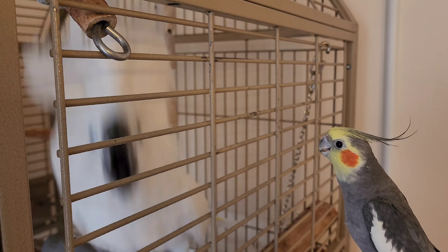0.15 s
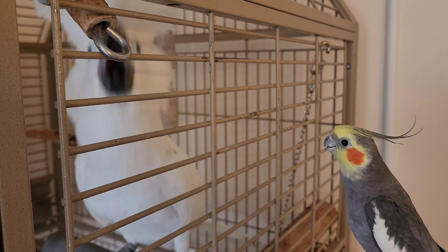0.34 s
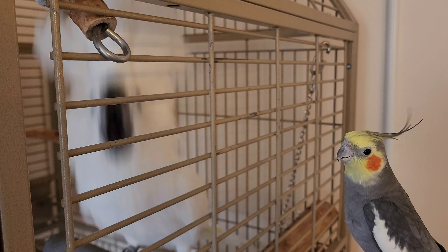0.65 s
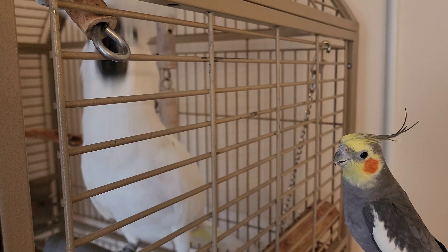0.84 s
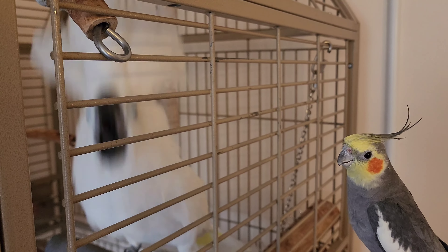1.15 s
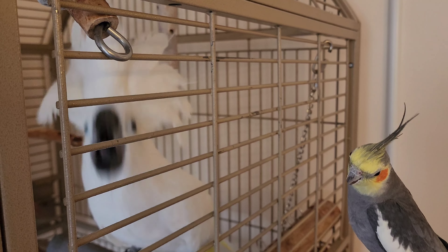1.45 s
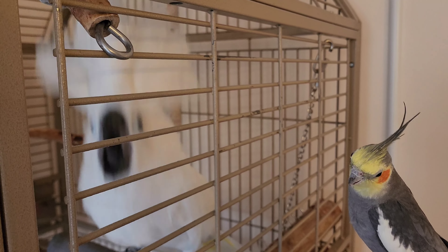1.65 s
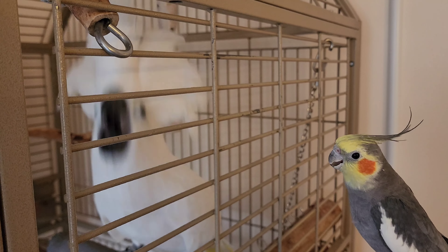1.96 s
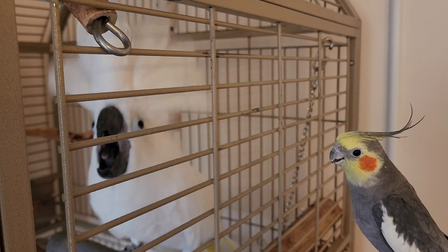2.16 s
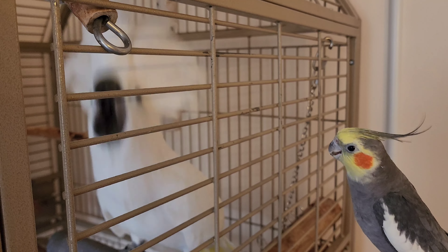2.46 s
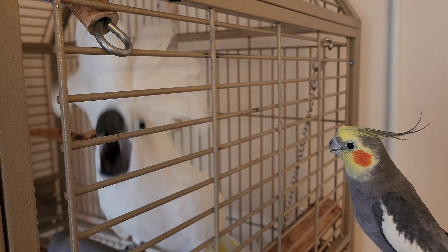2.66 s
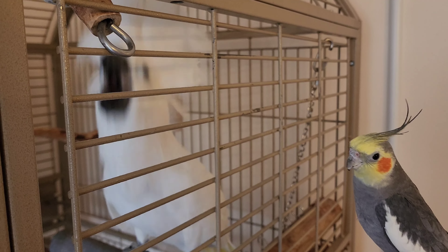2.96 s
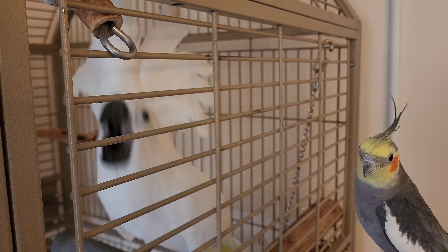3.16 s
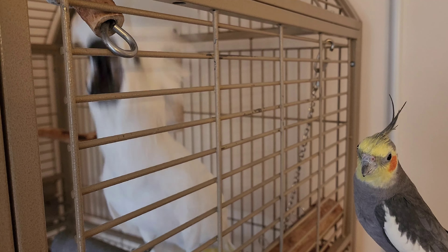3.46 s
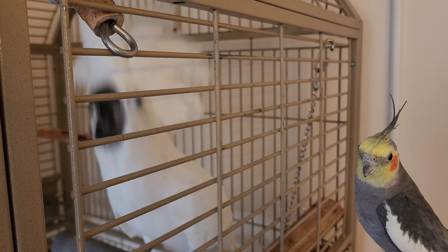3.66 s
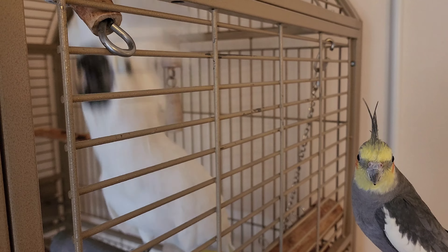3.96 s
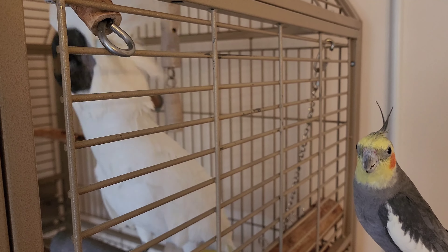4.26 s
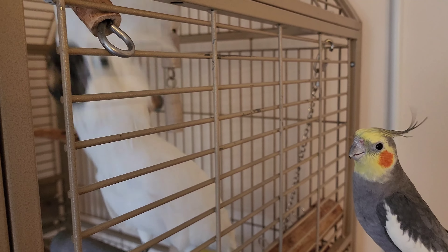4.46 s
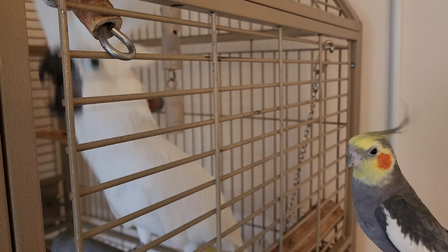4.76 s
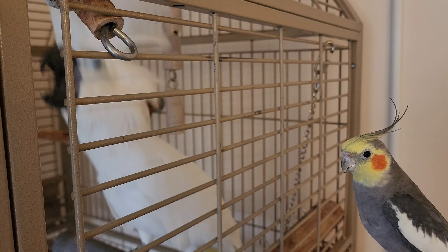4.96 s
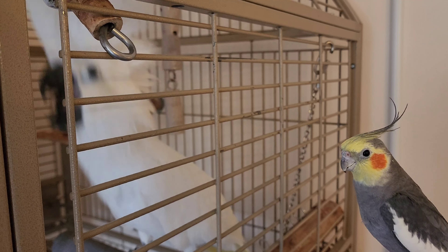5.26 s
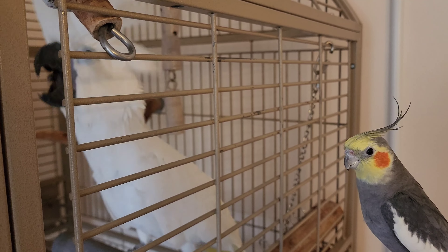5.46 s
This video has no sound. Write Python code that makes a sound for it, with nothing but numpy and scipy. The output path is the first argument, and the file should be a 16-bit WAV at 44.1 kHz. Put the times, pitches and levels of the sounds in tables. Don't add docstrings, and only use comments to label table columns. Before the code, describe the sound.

A cockatoo in a wire cage opens with a breathy rasp that jumps into a whistle and a rough squawk. After a pause come a thin whistle, a long surging squawk and a quick bark, then a rattle of the cage and a last broken squawk. Claws tick throughout. Small quiet room, faint low hum, close stereo microphone with the bird slightly to the right.

```python
import sys
import numpy as np
from scipy import signal
from scipy.fft import rfft, irfft, next_fast_len
from scipy.io import wavfile
from scipy.ndimage import uniform_filter1d

SR = 44100
rng = np.random.default_rng(int(sys.argv[2]) if len(sys.argv) > 2 else 0)


def waveform_to_disk(signal):
    frames = np.transpose(np.atleast_2d(signal))
    scaled = np.clip(frames, -1, 1) * 32767
    samples = np.round(scaled).astype(np.int16)
    wavfile.write(sys.argv[1], SR, samples)


def decibels_to_gain(level_db):
    exponent = np.asarray(level_db, float) / 20
    return 10 ** exponent


N = 247401

# (pitch_hz, level_db [dB per Hz])
SCUFF = [(240, -32), (400, -6.5), (943, -43), (1210, 0), (1660, -6.5), (4110, -12.5), (7810, -9.5),
         (11600, -9.5), (15600, -11)]
# (start_s [s], effort_db [dB], mouth_hz [Hz])
RASPS = [
    [(0, -43, 2459), (.04, -35.5, 2462), (.076, -38, 2363), (.1, -43, 2531)],
    [(4.108, -71.5, 2610), (4.124, -54.5, 2618), (4.14, -57, 2700), (4.174, -48.5, 3151),
     (4.232, -39.5, 3225), (4.25, -40.5, 3233)],
    [(4.25, -42, 3230), (4.274, -45.5, 3150), (4.3, -50.5, 2997)],
]


def rms_one(x):
    return x / np.sqrt(np.mean(x ** 2) + 1e-20)


def in_time(rows, times):
    s, *columns = np.transpose(rows)
    return [np.interp(times, s, c) for c in columns]


def at_hz(points, hz):
    points = np.array(points, float)
    return np.interp(np.log(hz + 1), np.log(points[:, 0] + 1), points[:, 1])


def coloured(x, spectrum):
    size = x.shape[-1]
    hz = np.arange(size // 2 + 1) * SR / size
    return rms_one(irfft(rfft(x) * decibels_to_gain(at_hz(spectrum, hz)), size))


def drift(size, rate_hz):
    r = np.exp(-2 * np.pi * rate_hz / SR)
    white = rng.standard_normal(size + 4000)
    return rms_one(signal.lfilter([1], [1, -2 * r, r * r], white)[4000:])


def resonance(x, hz, width_hz):
    r = np.exp(-np.pi * width_hz / SR)
    return signal.lfilter([1, 0, -1], [1, -2 * r * np.cos(2 * np.pi * hz / SR), r * r], x)


def moving_resonance(x, hz, width_hz):
    turn = np.exp(2j * np.pi * np.cumsum(hz) / SR)
    peak = signal.lfilter([1], [1, -np.exp(-np.pi * width_hz / SR)], x / turn)
    skirts = signal.butter(2, 0.68 * width_hz, fs=SR, output="sos")
    return np.real(signal.sosfilt(skirts, peak) * turn)


def evened(x):
    return x / np.sqrt(uniform_filter1d(x ** 2, size=530) + 1e-12)


def ring(clicks, hz, t60):
    r, w = decibels_to_gain(-60 / (t60 * SR)), 2 * np.pi * hz / SR
    return signal.lfilter([0, np.sin(w)], [1, -2 * r * np.cos(w), r * r], clicks + 1e-18)


def moments(rows):
    times = np.arange(N) / SR
    return sum(height * np.exp(-((times - s) / half) ** 4) for s, half, height in rows)


def syllables(tables):
    times = np.arange(N) / SR
    gate = sum((times >= rows[0][0]) & (times < rows[-1][0]) for rows in tables)
    columns = in_time([row for rows in tables for row in rows], times)
    return [uniform_filter1d(np.asarray(c, float), size=130) for c in [gate, *columns]]


def echoes(size):
    # (pitch_hz [Hz], t60_s [s])
    room_t60 = [(300, .1), (1500, .34), (2600, .25), (3300, .24), (4100, .3), (5000, .18), (14000, .12)]
    after = np.arange(SR // 2) / SR
    white = rfft(rng.standard_normal((2, len(after))))
    hz = np.arange(len(after) // 2 + 1) * 2.
    centres, t60s = np.transpose(room_t60)
    reply = 0
    for one, t60 in zip(np.eye(len(centres)), t60s):
        band = irfft(white * at_hz(np.transpose([centres, one]), hz))
        reply = reply + band * decibels_to_gain(-60 * after / max(t60, .02))
    onset = np.clip((after - .004) / .012, 0, 1)
    return rfft(reply * onset / np.sqrt(0.024 * SR), size)


def at_ports(x, room_db, bird):
    # (pitch_hz [Hz], level_db [dB])
    balance = [(60, 4), (110, -12), (200, 1), (380, 6.5), (700, 3), (1290, -4.5), (2380, -11),
               (4400, -10.5), (8120, -8.5), (15000, -14)]
    # (pitch_hz [Hz], phase [radians])
    lead = [(0, 0), (430, 0.1), (1460, -1.3), (3270, -0.1), (3620, -0.7), (4650, -0.3), (6800, -1.3),
            (8010, -0.4), (9470, 9.2), (12000, 16.3), (13000, 16.0), (13400, 17.9), (15000, 19.8),
            (15300, 19.2)]
    size = next_fast_len(N + SR // 2)
    hz, spectrum = np.arange(size // 2 + 1) * SR / size, rfft(x, size)
    half = decibels_to_gain(at_hz(balance, hz) / 2)
    if bird:
        half = half * np.exp(.5j * np.interp(hz, *np.transpose(lead)))
        both = 2 / np.abs(half + 1 / half).clip(1.)
    else:
        half, both = half * np.exp(1j * np.pi * hz * .00018), 1.4
    direct = np.array([both * half, both / half])
    return irfft(spectrum * (direct + decibels_to_gain(room_db) * echoes(size)), size)[:, :N]


def appliance_hum():
    # (pitch_hz [Hz], level_db [dB per Hz])
    rumble = [(12, -41.5), (20, -8.5), (43, -2), (102, -13), (129, -10), (188, -6.5), (221, -1.5),
              (329, -8), (409, -9), (439, -7.5), (608, -17), (783, -12.5), (1500, -32), (1950, -62.5),
              (3300, -120)]
    # (pitch_hz [Hz], width_hz [Hz], level_db [dB])
    tones = [
        (146.3, 13.84, -63),
        (220.6, 2.9, -64),
        (437, 53.4, -67.5),
    ]
    shared = decibels_to_gain(-58.0) * coloured(rng.standard_normal(N + 8), rumble)
    for hz, width_hz, level_db in tones:
        shared += decibels_to_gain(level_db) * rms_one(resonance(rng.standard_normal(N + 8), hz, width_hz))
    own = decibels_to_gain(-66.5) * coloured(rng.standard_normal((2, N)), rumble)
    return np.array([shared[8:], shared[:N]]) * decibels_to_gain(np.array([[1.2], [-1.2]])) + own


def hiss_level():
    times = np.arange(N) / SR
    peak_s, rise_db_per_s, fall_db_per_s = 0.031, 190, 35.5
    rustle_db = -46.5 - np.maximum(rise_db_per_s * (peak_s - times), fall_db_per_s * (times - peak_s))
    steady_db = -57.5 - 1.24 * times + 0.91 * drift(N, 4.5)
    return np.hypot(decibels_to_gain(steady_db), decibels_to_gain(rustle_db))


def room_hiss():
    # (pitch_hz [Hz], level_db [dB per Hz])
    colour = [(710, -38), (1200, -1.5), (1660, -9.5), (1900, -3.5), (2030, -6.5), (3360, -11.5),
              (3660, -11), (4440, -13), (5270, -14.5), (11800, -14.5), (15600, -13.5)]
    shared = coloured(rng.standard_normal(N + 8), colour)
    own = coloured(rng.standard_normal((2, N)), colour)
    hiss = 0.16 * np.array([shared[8:], shared[:N]]) + 0.83 * own
    return hiss * hiss_level() * decibels_to_gain(1.4 * drift(N, 4.5))


def thumps():
    # (start_s [s], peak_db [dB])
    shifts = [
        (0.884, -53.5),
        (1.559, -60),
    ]
    pushes = np.zeros(N)
    for s, peak_db in shifts:
        pushes[round(s * SR)] = decibels_to_gain(peak_db + 13.5)
    return ring(pushes, 71, 0.078)


def rattle():
    # (start_s [s], level_db [dB])
    shake = [
        (3.189, -59.5),
        (3.204, -37.5),
        (3.211, -44.5),
        (3.218, -40.5),
        (3.234, -55),
        (3.3, -60),
    ]
    # (pitch_hz [Hz], level_db [dB], t60_s [s])
    wires = [(1203, 1.5, 0.066), (1500, -22.5, .05), (2900, -3, 0.094), (4010, -29, 0.1), (4390, 2, .06),
             (4660, 3, 0.05), (6650, 2, 0.082), (12000, -14, .04)]
    gate, level_db = syllables([shake])
    contacts = (rng.random(N) < 7000 / SR) * rng.standard_normal(N)
    shaken = gate * decibels_to_gain(level_db) * rms_one(contacts)
    rings = sum(decibels_to_gain(wire_db - 40.5) * ring(shaken, hz, t60) for hz, wire_db, t60 in wires)
    return rings + coloured(shaken, SCUFF) * np.std(shaken) * decibels_to_gain(-6.0)


def claws():
    # (start_s [s], peak_db [dB], wire_hz [Hz], scuff_t60_s [s])
    contacts = [(0.0458, -29, 4700, 0.088), (0.083, -32.5, 11500, 0.14), (0.564, -41.5, 4660, 0.21),
                (0.64, -49.5, 4600, 0.069), (0.6824, -47.5, 3900, 0.087), (0.7683, -53.5, 4460, 0.17),
                (0.7828, -46, 6830, 0.25), (0.8352, -53.5, 6500, 0.22), (0.9251, -38, 4280, 0.11),
                (1.022, -46, 4410, 0.16), (1.1103, -41.5, 4660, 0.093), (1.273, -49.5, 3190, 0.37),
                (1.5399, -45, 4590, 0.17), (1.672, -41.5, 9070, 0.083), (1.778, -45.5, 10600, 0.039),
                (1.789, -36.5, 10610, 0.031), (1.7534, -50.5, 3000, 0.097), (1.7955, -40.5, 3730, 0.034),
                (2.747, -46.5, 4620, 0.17), (2.9123, -54, 4180, 0.056), (3.14, -51, 4010, 0.098),
                (3.4493, -49.5, 4580, 0.069), (3.5033, -49, 4390, 0.11), (3.691, -72.5, 4660, 0.095),
                (3.8085, -45.5, 2695, 0.024), (3.95, -61, 4430, 0.1), (4.866, -50, 4810, 0.27),
                (5.219, -49, 3970, 0.091), (5.379, -67.5, 4390, 0.075)]
    out, after = np.zeros(N), np.arange(6000) / SR
    scuffs = coloured(rng.standard_normal((len(contacts), len(after))), SCUFF)
    rise = np.minimum(after / .0002, 1)
    for (s, peak_db, hz, t60), scuff in zip(contacts, scuffs):
        dying = 0.3 * decibels_to_gain(-60 * after / 0.005) + 0.32 * decibels_to_gain(-60 * after / max(t60, .02))
        wire = 0.25 * np.sin(2 * np.pi * hz * after) * decibels_to_gain(-60 * after / 0.03)
        at = round(s * SR)
        out[at:at + len(after)] += decibels_to_gain(peak_db - 2.0) * (scuff * rise * dying + wire)[:N - at]
    return out


def whistle_partials():
    # (start_s [s], half_pitch_hz [Hz], level_db [dB], opening_db [octave over note, dB])
    whistle_1 = [(.085, 684, -49, -22), (.113, 649.3, -34, -26), (.135, 864, -25, -13),
                 (.15, 902, -22.5, -12.5), (.172, 1009, -18, -20.5), (.186, 1007, -20, -28.5),
                 (.189, 942, -21, -5), (.203, 779, -26, -13), (.22, 672, -36, -12)]
    whistle_2 = [(1.664, 851, -36.5, -19), (1.672, 642.8, -42, -10), (1.722, 673, -39, -32.5),
                 (1.738, 656, -35.5, -35.5), (1.762, 720, -35.5, -34), (1.781, 737.5, -35, -46),
                 (1.827, 711.2, -34, -33), (1.849, 702.3, -33, -40), (1.86, 616.7, -39.5, -24)]
    whistle_3 = [(1.86, 644, -41.5, -14.5), (1.889, 657, -32, -28.5), (1.931, 738, -30.5, -18),
                 (1.942, 777, -31.5, -15.5), (1.944, 632, -36, -16), (1.951, 481, -40, 0.5),
                 (1.961, 513, -42.5, -4.5), (1.972, 767, -39, 7)]
    whistle_4 = [(2.265, 778, -36, -4.5), (2.27, 688, -23.5, 17.5), (2.287, 677, -22.5, 15.5),
                 (2.299, 646, -29, 15), (2.312, 674, -19.5, 18), (2.338, 691, -22, 15),
                 (2.35, 710, -30.5, 5), (2.372, 682, -39, -19)]
    whistle_5 = [(2.372, 714, -37, -19.5), (2.402, 703.8, -39, -38), (2.446, 694.4, -35, -36),
                 (2.461, 640.7, -39, -32), (2.474, 603, -43, -10), (2.483, 489.8, -38.5, -14)]
    whistle_6 = [(4.289, 659.4, -46.5, -32), (4.305, 655, -41.5, -13), (4.32, 680, -33, -14),
                 (4.342, 750, -30, -10), (4.356, 765.3, -26, -8.5), (4.366, 720, -23, 6.5),
                 (4.372, 677, -23.5, -10)]
    twelfths_db = [-33.5, -20, -25.5, -40, -17, -18.5]
    overtones_db = [-39, -61, -54.5, -32.5, -52, -49.5]
    # (start_s [s], half_length_s [s], half_line_db [dB under the level])
    doublings = [(0.109, 0.018, -9), (0.218, 0.019, 1.5), (1.708, 0.038, -3), (1.78, 0.086, -12.5),
                 (1.953, 0.013, -8), (2.299, 0.0094, -15.5), (2.361, .014, -36), (2.407, 0.054, -13.5),
                 (4.301, 0.019, -3.5), (4.357, 0.0058, -14)]
    # (start_s [s], half_length_s [s], gain_db [dB])
    swells = [
        (1.712, 0.046, 10.5),
        (1.885, .028, 8.5),
        (1.947, .007, -16),
    ]
    whistled = [whistle_1, whistle_2, whistle_3, whistle_4, whistle_5, whistle_6]
    tables = [[(*row, *dbs) for row in rows] for rows, *dbs in zip(whistled, twelfths_db, overtones_db)]
    gate, half_hz, level, opening, twelfth, high = syllables(tables)
    note = level - 10 * np.log10(1 + decibels_to_gain(2 * opening))
    doubling = moments([(s, half, decibels_to_gain(db)) for s, half, db in doublings]) + decibels_to_gain(-44)
    detuned_khz = np.abs(6 * half_hz - 4070) / 1000
    twelfth = twelfth + level + 0.45 * opening - 5 * detuned_khz + moments(swells)
    return gate, half_hz, note, level + 20 * np.log10(doubling), note + opening, twelfth, note + high


def whistles():
    gate, half_hz, note, half, octave, twelfth, high = whistle_partials()
    loose = 1 / (1 + 0.42 * decibels_to_gain(octave - note))
    cycles = np.cumsum(half_hz * (1 + 0.0088 * loose * drift(N, 270))) / SR
    upper_half = half + 0.52 * (octave - note) - 3
    levels = {
        1: np.minimum(half, -46) - 8 - np.maximum(octave - note, 0),
        2: note, 3: half, 4: octave, 5: upper_half, 6: twelfth, 7: upper_half - 14,
        8: np.maximum(twelfth - 13, high + 1.1), 9: high - 4,
        10: np.maximum(twelfth - 11, high), 11: high - 9,
        12: np.maximum(twelfth - 13, high - 1.5)}
    levels.update({k: np.maximum(octave - 38, note - 43) for k in range(14, 24, 2)})
    out = np.zeros(N)
    for k, level_db in levels.items():
        shimmer_db = (.35 * min(k, 20) + 2.5 * (k % 2)) * loose * drift(N, 50)
        haze = (.012 * k * min(k, 6) + .3 * (k % 2)) * loose * drift(N, 200)
        partial = np.sin(2 * np.pi * k * cycles) * (k * half_hz < 16000)
        out += np.sqrt(2) * decibels_to_gain(level_db + shimmer_db) * (1 + haze) * partial
    effort = np.hypot(decibels_to_gain(note), decibels_to_gain(octave))
    breath = decibels_to_gain(-31) * rms_one(resonance(rng.standard_normal(N), 1900, 1000))
    return gate * (out + effort * breath), gate * effort * decibels_to_gain(-34.0)


def squawk_controls():
    # (start_s [s], effort_db [dB], mouth_hz [Hz])
    harsh = [
        [(.187, -43.5, 2428), (.2, -37, 2279), (.22, -23, 2586), (.238, -29, 2919)],
        [(.238, -30.5, 2930), (.266, -22.5, 3072), (.276, -22, 3181), (.316, -27, 3360), (.332, -27, 3265),
         (.342, -56, 3220)],
        [(1.95, -52.5, 2961), (1.982, -27, 3001), (2.01, -23.5, 3089), (2.08, -25.5, 3237), (2.1, -23.5, 3145),
         (2.126, -22, 3219), (2.156, -16.5, 3051), (2.162, -31.5, 2900), (2.178, -48.5, 2800)],
        [(2.47, -49.5, 2605), (2.49, -30, 2722), (2.512, -17, 2882), (2.535, -24.5, 3049), (2.565, -40, 2968)],
        [(4.355, -36.5, 2750), (4.369, -24.5, 2688), (4.407, -21.5, 2837), (4.417, -27, 3086),
         (4.441, -16.5, 3180), (4.463, -25.5, 2906), (4.485, -22.5, 3540), (4.495, -63.5, 3360)],
    ]
    # (throat_hz [Hz], throat_db [dB at usual effort],
    # throat_follows [share of effort], mouth_db [dB], brightness_db [dB], tone_share [0-1])
    voicings = [(1800, -23.5, 1, -23, -10, .1), (1613, -23, 1, -10, -7, 0.7),
                (1610, -21.5, 0.99, -20, -32, 0.2), (1550, -29, 0.87, -1.5, -9.5, 0),
                (1494, -37, 0.84, 3, -10.5, 0.3), (1927, -44.5, .2, -0.5, -18.5, 0.4),
                (1772, -40, 0.82, -1.7, -10.5, 0.4), (1505, -41, 0.46, -0.3, -10, 0.55)]
    usual_db = -25
    tables = [[(*row, *voicing) for row in rows] for rows, voicing in zip(RASPS + harsh, voicings)]
    gate, effort, mouth_hz, throat_hz, throat, follows, mouth, bright, tonal = syllables(sorted(tables))
    mouth, bright = uniform_filter1d([mouth, bright], size=2200)
    mouth = mouth + effort
    throat = throat + follows * (effort - usual_db) - mouth
    upper = bright + 5 - 0.12 * (mouth - usual_db)
    air = bright - 0.13 * (mouth - usual_db)
    pulse_hz = mouth_hz / 3.02
    return gate, mouth, upper, throat, air, mouth_hz, throat_hz, pulse_hz, tonal, syllables(RASPS)[0]


def membrane_slaps():
    # (start_s [s], rate_hz [slaps per s], slap_db [dB over the voice], pulsing_db [dB of level])
    slapping = [(.19, 330, -3, 1), (.272, 400, 0, 1), (.295, 300, 0, 1.5), (.335, 170, 3, 6),
                (1.96, 330, -12, 1), (2.16, 300, -14, 0), (2.48, 300, -14, 0), (2.525, 260, -12, 0),
                (2.56, 180, -4, 4), (4.36, 220, -14, 0), (4.49, 220, -14, 0)]
    rate_hz, slap_db, pulsing_db = in_time(slapping, np.arange(N) / SR)
    turns = np.cumsum(rate_hz * (1 + .13 * drift(N, 60))) / SR
    flutter = uniform_filter1d(1.1 - 2.2 * (turns % 1), size=20)
    slaps = rms_one(np.diff(np.floor(turns), prepend=0) * decibels_to_gain(2 * drift(N, 200)))
    return flutter, slaps, slap_db, pulsing_db


def membrane_tone(mouth_hz, rough, flutter):
    phase = 2 * np.pi * np.cumsum(mouth_hz * (1 + .035 * drift(N, 120))) / SR
    tone = np.sin(phase) + decibels_to_gain(-34.5) * np.sin(2 * phase)
    return np.sqrt(2) * tone * (1 + 1.2 * rough ** 2 * flutter)


def throat_voice(source, throat_hz, throat, rasp):
    # (pitch_hz [Hz], level_db [dB per Hz])
    breath = [(400, -14), (750, -3), (1500, -1.5), (3000, -8), (5500, -12.5), (8000, -10.5), (11500, -13),
              (15000, -30)]
    narrow = np.clip(.75 * rasp * np.linspace(1, .4, N), 0, 1)
    wander_hz = throat_hz * (1 + 0.062 * drift(N, 18))
    wide_band = evened(moving_resonance(source, throat_hz, 790))
    narrow_band = evened(moving_resonance(rng.standard_normal(N), wander_hz, 220))
    voice = np.sqrt(1 - narrow) * wide_band + np.sqrt(narrow) * narrow_band
    voice += decibels_to_gain(-15) * evened(resonance(source, 720, 294))
    voice += decibels_to_gain(-8) * rasp * coloured(rng.standard_normal(N), breath)
    return decibels_to_gain(throat) * voice


def squawks():
    # (start_s [s], half_length_s [s], roughness_lost [0-1])
    clearings = [(.3, .04, .05), (1.99, .008, .35), (2.031, .007, .35), (2.122, .01, .4), (2.148, .011, .4),
                 (2.508, .026, .38), (4.452, .02, .33)]
    # (start_s [s], half_length_s [s], gain_db [dB])
    catches = [(.2695, .003, -20), (1.981, .003, -8), (2.131, .0015, -10), (2.5175, .0008, -15),
               (2.532, .0015, -10), (4.3805, .002, -13), (4.388, .0015, -9), (4.395, .0025, -13),
               (4.405, .0025, -18), (4.4155, .0025, -14), (4.426, .002, -20), (4.436, .002, -7),
               (4.473, .005, -8)]
    # (start_s [s], half_length_s [s], gain_db [dB])
    surges = [(1.991, 0.0087, 8), (2.03, 0.005, 4.5), (2.12, 0.019, 4.5), (2.14, 0.0097, 5),
              (4.421, 0.0034, 8), (4.431, 0.004, 2), (4.465, 0.008, -1), (2.4955, 0.0031, 2.5),
              (2.534, 0.0033, 6.5), (2.5432, 0.00053, -1.5), (0.55, .001, 5.5), (0.274, .003, 2),
              (4.482, 0.0039, -1)]
    gate, mouth, upper, throat, air, mouth_hz, throat_hz, pulse_hz, tonal, rasp = squawk_controls()
    clearing = moments(clearings)
    rough = .8 - clearing
    cycles = np.cumsum(pulse_hz * (1 + 0.14 * rough ** 2 * drift(N, 260))) / SR
    pulses = np.diff(np.floor(cycles), prepend=0) * decibels_to_gain(4 * rough * drift(N, 300))
    flutter, slaps, slap_db, pulsing_db = membrane_slaps()
    source = rms_one(pulses - pulses.mean()) + 1.97 * rough ** 2 * rng.standard_normal(N)
    source *= decibels_to_gain(3.2 * rough * flutter * (1 - rasp))
    source += decibels_to_gain(slap_db) * rough * (1 - rasp) * np.std(source) * slaps
    tone = membrane_tone(mouth_hz, rough, flutter)
    tonal = np.clip(tonal + 1.5 * clearing, 0, .95)
    voice = np.sqrt(1 - tonal) * evened(moving_resonance(source, mouth_hz, 640))
    voice += np.sqrt(tonal) * evened(tone)
    upper_hz = np.minimum(mouth_hz + 850, 4150)
    voice += decibels_to_gain(upper) * evened(moving_resonance(source, upper_hz, 750))
    voice += throat_voice(source, throat_hz, throat, rasp)
    voice = signal.sosfilt(signal.butter(8, 4650, fs=SR, output="sos"), voice)
    effort = gate * decibels_to_gain(mouth + moments(catches + surges) + pulsing_db * (flutter - 1.45))
    buzz = .5 * signal.lfilter([1, -1], [1], pulses) / np.std(pulses) + decibels_to_gain(slap_db) * slaps
    return effort * voice, effort * decibels_to_gain(air - 4 * rasp + 1.3 * flutter), buzz


def beak_air(level, buzz):
    # (pitch_hz [Hz], level_db [dB per Hz])
    colour = [(3500, -26), (5000, -9.5), (5800, -8), (7100, 3), (7800, -17), (9200, -38.5), (10200, -4.5),
              (15500, -2.5)]
    # (start_s [s], gap_hz [Hz], level_db [dB])
    gap = [(.1, 12000, 0), (.19, 12400, 2), (.29, 13500, -3), (.34, 13760, -10), (1.7, 13410, -5),
           (1.96, 13800, -3), (2.09, 14700, -1.5), (2.13, 13900, -5), (2.3, 13500, -2.5), (2.48, 13300, -1),
           (2.56, 13600, -2), (4.2, 12420, 4), (4.34, 12500, 5), (4.46, 14300, 1), (4.49, 14500, -10.5)]
    gap_hz, gap_db = in_time(gap, np.arange(N) / SR)
    level = level * decibels_to_gain(gap_db)
    white = rng.standard_normal((3, N))
    shared = white[2] + buzz
    hiss = coloured(np.array([shared, np.roll(shared, shift=1)]) + 0.65 * white[:2], colour)
    hiss += .8 * rms_one(moving_resonance(hiss, gap_hz, 2200))
    fade = decibels_to_gain(-60 / (.2 * SR))
    linger = signal.lfilter([1 - fade], [1, -fade], level)
    return (level + .15 * linger) * hiss * decibels_to_gain(np.array([[-1.2], [1.2]]))


def scene():
    background = appliance_hum() + room_hiss()
    cage = at_ports(claws() + rattle(), room_db=1, bird=False)
    clear, clear_air = whistles()
    harsh, harsh_air, buzz = squawks()
    bird = at_ports(clear + harsh, room_db=-10.5, bird=True) + beak_air(clear_air + harsh_air, buzz)
    return background + thumps() + cage + bird


def low_pass(x):
    return signal.sosfilt(signal.butter(12, 15720, fs=SR, output="sos"), x)


def record(dry):
    # (pitch_hz [Hz], level_db [dB])
    notch = [(7000, 1), (8300, -1.5), (9300, -2.5), (10300, -5), (11500, -0.5), (15000, -5.5), (15650, 1),
             (15800, -60.5)]
    response = decibels_to_gain(at_hz(notch, np.arange(N // 2 + 1) * SR / N))
    return low_pass(irfft(rfft(dry) * response, N))


dry = scene()
out = record(dry)
waveform_to_disk(out)
```